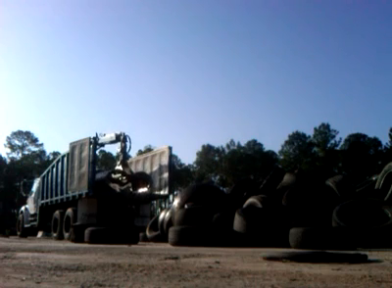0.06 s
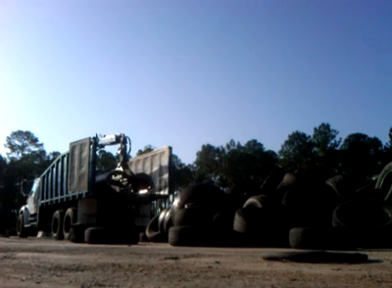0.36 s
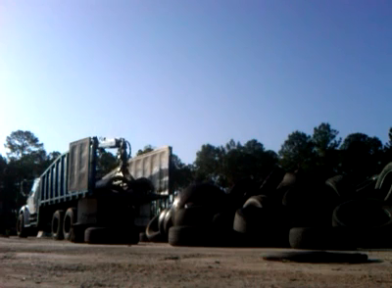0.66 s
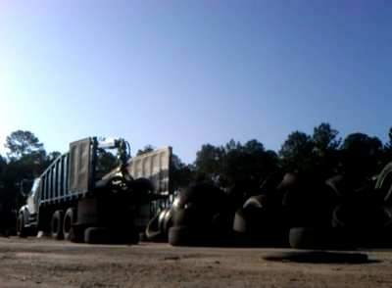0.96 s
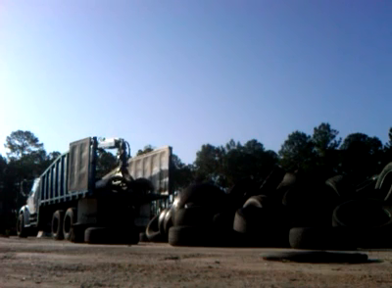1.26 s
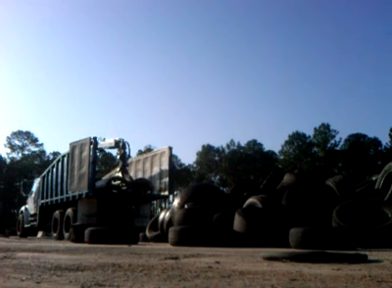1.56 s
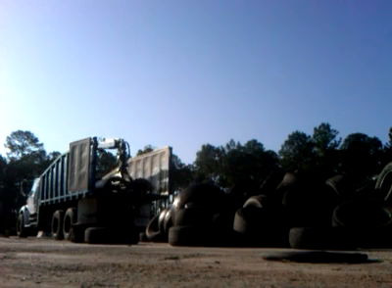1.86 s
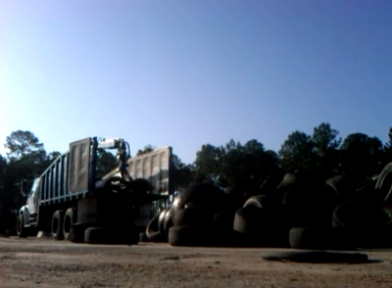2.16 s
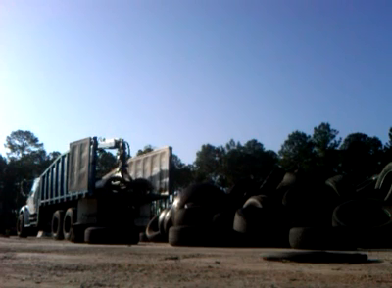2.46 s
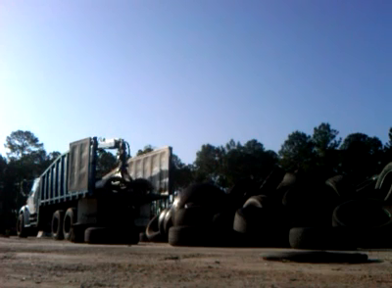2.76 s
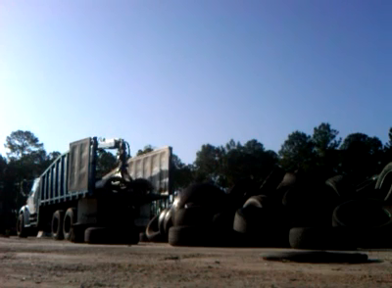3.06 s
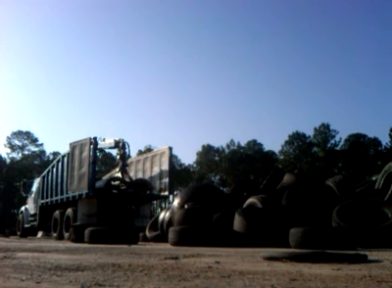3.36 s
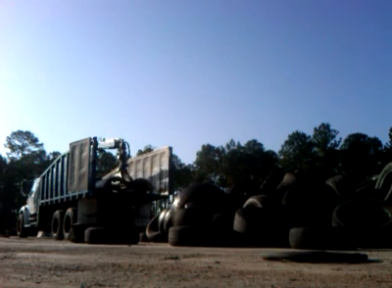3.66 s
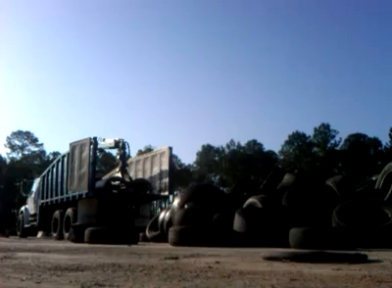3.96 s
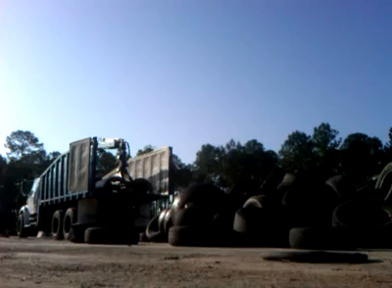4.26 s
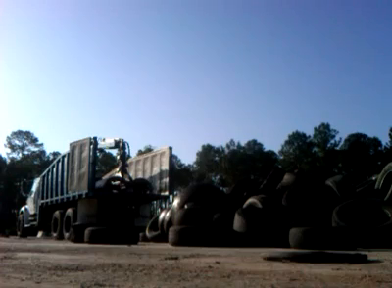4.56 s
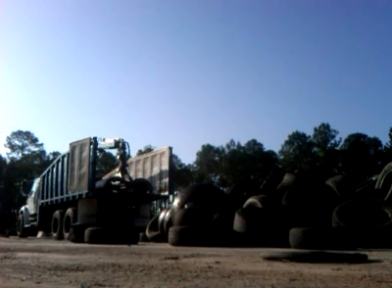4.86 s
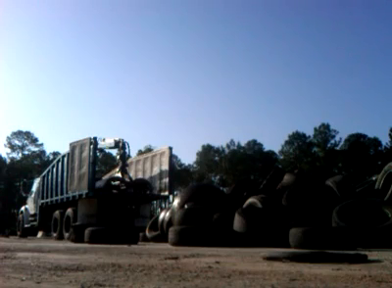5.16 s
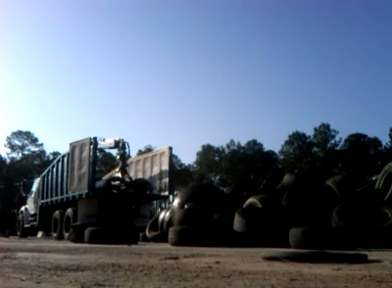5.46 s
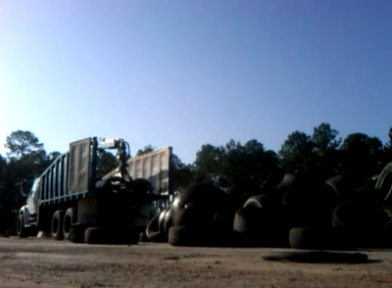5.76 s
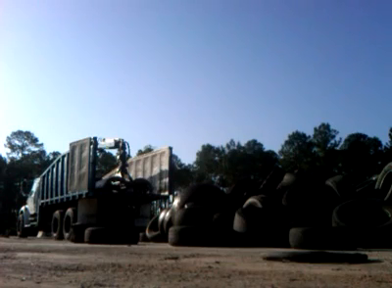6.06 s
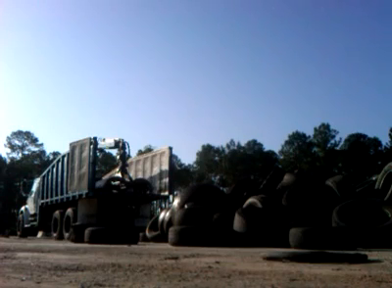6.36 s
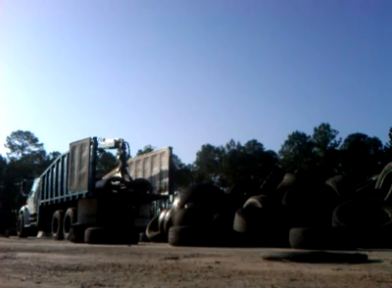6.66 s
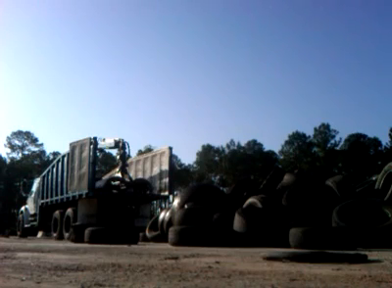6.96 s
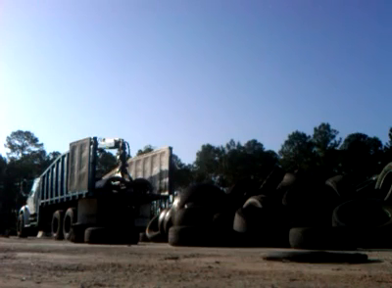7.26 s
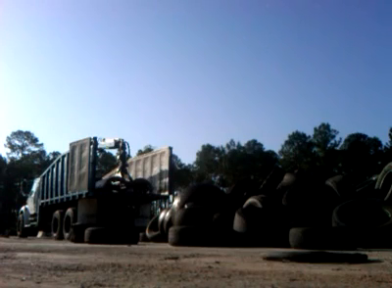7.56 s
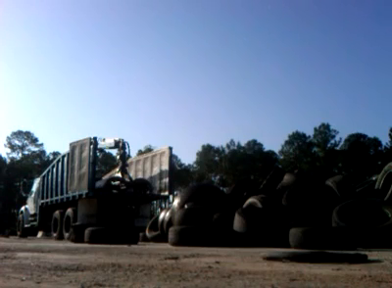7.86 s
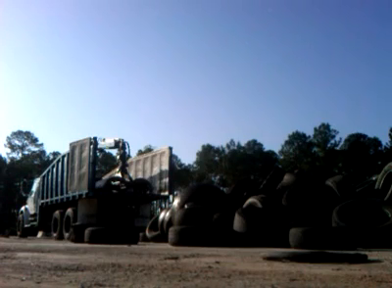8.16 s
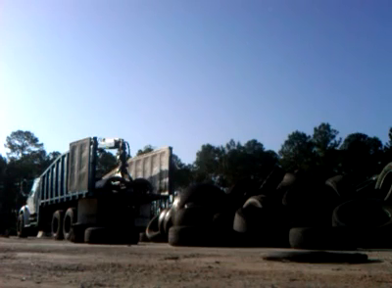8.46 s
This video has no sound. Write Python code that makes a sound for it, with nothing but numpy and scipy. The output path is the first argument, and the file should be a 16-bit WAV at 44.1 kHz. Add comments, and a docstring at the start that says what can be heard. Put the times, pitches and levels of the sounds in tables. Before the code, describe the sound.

In an open yard, a faint hydraulic whine stops as a grapple lands on a truck's steel dump body, booming loudly at a distance. The steel rings and smaller clanks die away over about a second. After that, the much quieter throb of two idling diesels fills the rest, with a low hum, a slight valve hiss and a light breeze bumping the microphone.

```python
"""A steel dump body booms as a loader's grapple drops onto it, some way off in an open tire yard.
Each blow sets the steel ringing, and the grapple's tines (its claws) clank as they settle.
A hydraulic pump whines until the grapple lands, and oil hisses through a valve. Two idling diesels
throb because their speeds differ slightly, and a breeze puffs on the microphone.
The recorder's gain control holds the bang down."""
import sys
import numpy as np
from scipy import signal
from scipy.fft import rfft, irfft, next_fast_len
from scipy.io import wavfile
from scipy.ndimage import uniform_filter1d

SR = 44100
rng = np.random.default_rng(int(sys.argv[2]) if len(sys.argv) > 2 else 0)


def unload_audio(sound):
    """Save the sound as a 16-bit wav file, at the path given as the first command line argument."""
    columns = np.transpose(np.atleast_2d(sound))
    # keep every value between -1 and 1, then stretch to whole-number steps
    steps = np.round(np.clip(columns, -1, 1) * 32767)
    wavfile.write(sys.argv[1], SR, steps.astype(np.int16))


N = 379701
TIME = np.arange(N) / SR


def amp(db):
    """Turns decibels into a number to multiply a sound by."""
    return 10 ** (np.asarray(db) / 20)


def read(points, hz):
    """Looks up a table's value at any frequency, on a logarithmic scale."""
    f, value = np.transpose(points)
    return np.interp(np.log(hz + 1), np.log(f + 1), value)


def add(mix, s, sound):
    """Mixes a sound in, starting at s seconds."""
    part = mix[round(s * SR):][:len(sound)]
    part += sound[:len(part)]


def drift(size, hz):
    """A random wobble that heads for a new value hz times a second."""
    knots = rng.standard_normal(2000)
    return np.interp(np.arange(size) / SR * hz, np.arange(len(knots)), knots)


def colour(x, spectrum, peaks=()):
    """Shapes a sound with a broad tone curve and narrow peaks, then sets its average (rms) level to 1."""
    size = next_fast_len(len(x))
    hz = np.fft.rfftfreq(size, 1 / SR)
    peaks_db = sum(rise / (1 + (2 * (hz - f) / width) ** 2) for f, width, rise in peaks)
    shaped = irfft(rfft(x, size) * amp(read(spectrum, hz) + peaks_db), size)[:len(x)]
    return shaped / np.sqrt(np.mean(shaped ** 2) + 1e-20)


def cycles(hz):
    """Counts the cycles gone by at a steady or changing rate."""
    return np.cumsum(hz * np.ones(N)) / SR


def swells(rows):
    """A level that rises and falls smoothly around each row's time."""
    return sum(amp(db) * np.cos(np.pi * np.clip((TIME - s) / length, -.5, .5)) ** 2
               for s, db, length in rows)


# puffs of wind: (peak t/s, level/dB, length/s)
PUFFS = [(3.451, -53, 0.17), (4.8, -48.5, 0.44), (5.407, -51, 0.5), (8.23, -41, 0.07)]
def breeze():
    """Moving air bumps the microphone and makes a soft, low rumble."""
    spectrum = [(15, -9), (35, 0), (60, 6), (110, -4), (220, -17), (800, -58), (3000, -93)]
    return swells(PUFFS) * colour(rng.standard_normal(N), spectrum)


# how hard each of the truck's six cylinders knocks, in firing order: level/dB
CYLINDERS = [-0.1, -0.5, 1.1, -0.27, -0.72, 0.46]
# tone curve of the engine block: (f/Hz, level/dB)
BLOCK = [(20, -23), (45, -6.5), (62, -9), (90, -1.5), (125, -0.5), (200, -5), (275, -11), (400, -9),
         (700, -17), (800, -11.5), (1300, -9.5), (1420, -15), (2350, -15.5), (2800, -24), (4600, -32),
         (6700, -46)]
# pitches at which the engine's panels ring, and one dip: (f/Hz, width/Hz, boost/dB)
PANELS = [(250.8, 8.1, 9), (297.4, 17, 8), (338.7, 17, 10), (388, 42, 3.5), (477, 35, 7.5), (517.4, 24, 9),
          (640, 78, 9), (913, 155, 6), (963, 16, -16), (1099, 19, 11.5), (1206, 94, 3.5), (1480, 14, 7.5),
          (1570, 18, 10), (1744, 34, 6.5), (2436, 8.4, 8)]
def knock(firings, repeat_db=-49.5, fresh_db=-48.5, depth=0.11):
    """Each cylinder rattles the block in its own way, over and over, with fresh noise on top."""
    count = len(CYLINDERS)
    cylinder_db = np.interp(firings, np.arange(count), CYLINDERS, period=count)
    # distance and echoes round each knock into a soft swell
    swell = 1 + depth * np.cos(2 * np.pi * firings)
    swell *= amp(cylinder_db + .5 * drift(N, hz=40))
    pattern = rng.standard_normal(6600)
    repeating = pattern[(firings / count % 1 * len(pattern)).astype(int)]
    return (amp(repeat_db) * colour(swell * repeating, BLOCK, PANELS)
            + amp(fresh_db) * colour(swell * rng.standard_normal(N), BLOCK, PANELS))


# the high ring of loose fittings: (f/Hz, width/Hz, boost/dB)
FITTINGS_RING = [(4200, 260, 4)]
def jingle(firings, level_db=-72.0, depth=0.3):
    """Loose fittings shake once per engine turn (three firings), a little unevenly."""
    turns = firings / (len(CYLINDERS) / 2)
    wander_db = 2.5 * np.tanh(drift(N, hz=18))
    shake = (1 + depth * np.cos(2 * np.pi * turns)) * amp(wander_db)
    bright = [(1500, -29.5), (3000, -8), (3700, -16), (4200, 0.5),
              (5200, -8), (6600, -11), (7200, -37.5)]
    return amp(level_db) * colour(shake * rng.standard_normal(N), bright, FITTINGS_RING)


# how the hum swells and fades: (t/s, level/dB)
HUM_LEVEL = [(0, -63), (2, -56), (5.4, -52), (6.6, -59)]
def hum(start_hz=82.745, sag_hz_per_s=.115):
    """A low hum, perhaps a cooling fan, sinks slowly in pitch."""
    level_db = np.interp(TIME, *np.transpose(HUM_LEVEL))
    return np.sqrt(2) * amp(level_db) * np.cos(2 * np.pi * cycles(start_hz - sag_hz_per_s * TIME))


# tones of the truck's exhaust: (multiple of its firing rate, level/dB)
TRUCK_NOTE = [(1, -49.5), (2, -47.5), (3, -63), (4, -66), (5, -68), (5 / 3, -66), (10, -66)]
# tone of the loader's exhaust: (multiple of its firing rate, level/dB)
LOADER_NOTE = [(1, -50.5)]
def exhausts(truck_firings, loader_firings, truck_db=-1.0):
    """Each exhaust pipe drones with low, clean tones in step with its engine."""
    def pipe(firings, note):
        return sum(np.sqrt(2) * amp(db) * np.cos(2 * np.pi * times * firings) for times, db in note)
    return amp(truck_db) * pipe(truck_firings, TRUCK_NOTE) + pipe(loader_firings, LOADER_NOTE)


TRUCK_HZ, LOADER_HZ = 40.0, 42.33  # firings a second
def diesels(swing_hz=1.125, crest_s=2.35, period_s=4.6, settle_s=4.0):
    """Two engines slip in and out of step, which makes the idle throb."""
    # the loader's speed control swings slowly and settles; the truck runs steadily
    swing = swing_hz * np.exp(-TIME / settle_s) * np.cos(2 * np.pi * (TIME - crest_s) / period_s)
    truck, loader = cycles(TRUCK_HZ), cycles(LOADER_HZ + swing)
    return exhausts(truck, loader) + hum() + knock(truck) + jingle(truck)


# spurts of oil: (peak t/s, level/dB, length/s)
SPURTS = [(.12, -66.5, 0.88), (5.42, -62, 0.3), (5.78, -68, .5)]
def valve():
    """Oil gives a thin hiss each time the valve opens."""
    spectrum = [(800, -28), (2500, -3), (3700, -6), (4250, 3.5), (5000, -9.5), (7000, -19)]
    return swells(SPURTS) * colour(rng.standard_normal(N), spectrum)


def pump(start_hz=913, sag_hz_per_s=10.9, start_db=-52, fade_db_per_s=.5, stop_s=0.82, release_s=0.23):
    """The pump's whine sinks and fades as the loader's arm drops, and stops as the grapple lands."""
    ripple_hz = 18 * np.cos(2 * np.pi * cycles(TRUCK_HZ))  # the pitch shakes at the firing rate
    wander_hz = 11 * drift(N, hz=110)
    turns = cycles(start_hz - sag_hz_per_s * TIME + ripple_hz + wander_hz)
    whine = np.sin(2 * np.pi * turns) + amp(-4) * np.sin(4 * np.pi * turns)  # a tone and its octave
    running = np.clip((stop_s - TIME) / release_s, 0, 1)
    flutter_db = 3.5 * drift(N, hz=110.4)
    return np.sqrt(2) * running * amp(start_db - fade_db_per_s * TIME + flutter_db) * whine


def octaves_up(hz):
    """Counts octaves above 500 Hz, where a softer hit starts to lose treble."""
    return np.log2(np.maximum(hz / 500, 1))


# tone curve of a tine's clatter: (f/Hz, level/dB)
CLATTER = [(120, -23.5), (400, 6.5), (700, -1.5), (1400, 0), (2200, -8), (2900, -9), (3500, -17.5),
           (4200, -18.5), (5200, -24.5), (7000, -29.5)]
# pitches that the grapple's frame brings out: (f/Hz, width/Hz, boost/dB)
FRAME = [(472, 93, 4), (908, 67, 9), (1313, 80, 8.5), (1580, 60, 5.5), (1800, 34, 6), (2546, 110, 0.5),
         (4150, 160, 3)]
# clear tones of a tine: (f/Hz, level/dB, fade/s), where a fade is a drop of 60 dB
TINE_TONES = [(1502, -2, .5), (1836, 0, .55), (3112, -13, .26), (3693, -11, .2), (4054, -10, .3)]
def tine(db, dullness, edge_hz, ring_db, build_s=.003, fade_s=.42):
    """A hit chatters on a tine and leaves it ringing; a broad contact lacks the top treble."""
    t = TIME[:SR // 2]
    # hard hits press on the tine: every 10.5 dB above -36 dB halves the clatter's length
    freedom = .5 ** (max(db + 36, 0) / 10.5)
    hz = np.geomspace(50, 8000, 60)
    curve_db = read(CLATTER, hz) - dullness * octaves_up(hz) - 10 * np.log10(1 + (hz / edge_hz) ** 10)
    chatter = amp(freedom * 3 * drift(len(t), hz=130)) * rng.standard_normal(len(t))
    clatter = colour(chatter, np.column_stack([hz, curve_db]), FRAME) * amp(-60 * t / (freedom * fade_s))
    ring = sum(amp(tone_db - 60 * t / ring_s) * np.sin(2 * np.pi * (f * t + rng.random()))
               for f, tone_db, ring_s in TINE_TONES)
    return amp(db) * (clatter + amp(ring_db) * ring) * (1 - np.exp(-t / build_s))


# clanks: (t/s, level/dB, treble cut/dB per octave, treble edge f/Hz, ring against clatter/dB)
CLANKS = [(.716, -42.5, -2.5, 5670, -10), (0.913, -22, -7, 7000, -15.5), (1.14, -48, -8.5, 6070, -12),
          (1.178, -47, -7.5, 6100, -11), (1.245, -43, -3.5, 6060, -9), (1.298, -40, -4.5, 5500, -14),
          (1.322, -34.5, -0.5, 3980, -15.5), (1.372, -50, -9, 5600, -11), (1.405, -42, -1.5, 5500, -10),
          (1.561, -39.5, -5.5, 5100, -3), (1.586, -42.5, -1, 4540, -6), (1.849, -28, -3, 2624, -20.5),
          (1.934, -48.5, -4, 5370, -8), (1.973, -56, -4, 5500, -8), (2.072, -47.5, -2, 6620, -19),
          (3.495, -53, -1, 6000, -11), (6.571, -51, 0, 6000, -8)]
def grapple(ticks_per_s=1.5):
    """The tines clank as they slip and settle, and tick faintly at random moments."""
    out = np.zeros(N)
    for s, db, dullness, edge_hz, ring_db in CLANKS:
        add(out, s, tine(db, dullness, edge_hz, ring_db))
    strikes = (rng.random(N) < ticks_per_s / SR) * rng.random(N)
    tick = tine(db=-54.5, dullness=-5.5, edge_hz=7200, ring_db=-5.5)
    return out + signal.oaconvolve(strikes, tick)[:N]


# deepest tones of the dump body's plates: (f/Hz, level/dB, fade/s)
PLATES = [(78, -14, 3.0), (92, -16, 1.4), (109, -7.5, 1.5), (135, -0.5, 0.95), (179, -4, 1.9),
          (184, -6, 2.2), (213, -13, 1.9), (238, -8, 1.5), (255, -9, 1.7), (267, -2, 1.45),
          (301, -9.5, 1.6), (312, -4, 1.3), (361, -3, 1.3), (368, -7, 1.45), (381, -7, 1.7),
          (402, -5.5, 1.4), (414, -6, 1.5), (425, -7, 1.2), (461, -10, 1.6), (478, -7.5, 1.4),
          (497, -11, 1.9), (511, -11, 1.6), (535, -9, 1.3), (549, -7, 1.3), (678, -9, 1.2), (698, -9, 1.2),
          (735, -9, 1.0), (873, -8, 1.1), (931, -10, 1.1)]
def plates(swell_s=0.037, wobble_hz=0.91):
    """The big plates take a moment to swell, then waver in pitch and loudness as they flex."""
    t = TIME[:5 * SR // 2]
    ring = np.zeros(len(t))
    for k, (hz, db, fade_s) in enumerate(PLATES):
        turns = np.cumsum(hz + wobble_hz * drift(len(t), hz=8.9)) / SR
        waver_db = 3 * np.tanh(drift(len(t), hz=11))
        ring += (-1) ** k * amp(db + waver_db - 60 * t / fade_s) * np.sin(2 * np.pi * turns)
    return ring * (1 - np.exp(-t / swell_s))


# tone curve of the body's many weaker tones: (f/Hz, level/dB)
STEEL = [(20, -30), (55, -14), (105, -1.5), (135, 2.5), (220, -2.5), (390, -1), (540, -5), (620, -6),
         (900, -6.5), (1400, -9.5), (2000, -6), (2700, -8.5), (3200, -16), (4000, -21), (4600, -30),
         (7000, -41)]
# how long they ring: (f/Hz, fade/s)
STEEL_FADE = [(80, 1.3), (200, 1.5), (450, 1.3), (900, 1.11), (1600, 0.58), (2600, 0.3), (4000, 0.37),
              (7000, 0.55)]
# bright peaks from the body's ribs and the grapple: (f/Hz, width/Hz, boost/dB)
RIBS = [(1339, 16, 8.5), (1720, 20, 4.5), (2160, 25, 3), (2630, 57, 9.5), (3320, 120, 6.5), (3970, 110, 9),
        (5130, 25, 10)]
def crash(dullness, build_s=0.0027):
    """One blow wakes so many tones in the steel that they blur into noise; the treble dies first."""
    t = TIME[:5 * SR // 2]
    noise = colour(rng.standard_normal(len(t)), STEEL, RIBS)
    hz, s, bands = signal.stft(noise, SR, nperseg=512)  # split up so each band fades at its own pace
    bands = bands * amp(-60 * s / read(STEEL_FADE, hz)[:, None] - dullness * octaves_up(hz)[:, None])
    fading = signal.istft(bands, SR, nperseg=512)[1][:len(t)]
    return fading * (1 - np.exp(-t / build_s))


# heavy blows and softer bounces on the dump body: (t/s, level/dB, treble cut/dB per octave)
BLOWS = [(.836, -8, 3), (.859, -11, -1.5), (.912, -11, -0.5), (.944, -14, 9.5), (1.034, -19, 6),
         (1.134, -19, 19), (1.27, -24.5, 15), (1.35, -34.5, 15), (1.61, -32.5, 7), (1.949, -36, 10)]
def dump_body(crash_db=-3, plates_db=-16):
    """The tines land one after another; the weight of the first blow sets the plates going."""
    out = np.zeros(N)
    for s, db, dullness in BLOWS:
        add(out, s, amp(db + crash_db) * crash(dullness))
    add(out, BLOWS[0][0], amp(plates_db) * plates())
    return out


def scene():
    """The whole yard, heard at one microphone."""
    return (dump_body() + grapple() + diesels() + pump() + valve() + breeze())[None]


def gain_control(x, threshold_db=-17.0, share=0.81, recovery_db_per_s=80):
    """Turns the volume down at once when the sound gets too loud, then lets it come back."""
    power_db = 10 * np.log10(abs(uniform_filter1d(x ** 2, size=500)) + 1e-12)
    fall_db = TIME * recovery_db_per_s
    held_db = np.maximum.accumulate(power_db + fall_db) - fall_db  # jumps to each peak, then sinks
    over_db = np.maximum(held_db - threshold_db, 0)
    return x * amp(-share * uniform_filter1d(over_db, size=150))


def record(dry, ceiling=.36, edge_hz=7150):
    """The recorder holds the bang down, rounds off the peaks and cuts the highest treble."""
    held = gain_control(dry[0])
    rounded = held / (1 + (held / ceiling) ** 4) ** (1 / 4)
    treble_cut = signal.firwin(401, edge_hz, window=("kaiser", 8), fs=SR)
    return signal.oaconvolve(rounded, treble_cut, "same")[None]


dry = scene()
out = record(dry)
unload_audio(out)
```